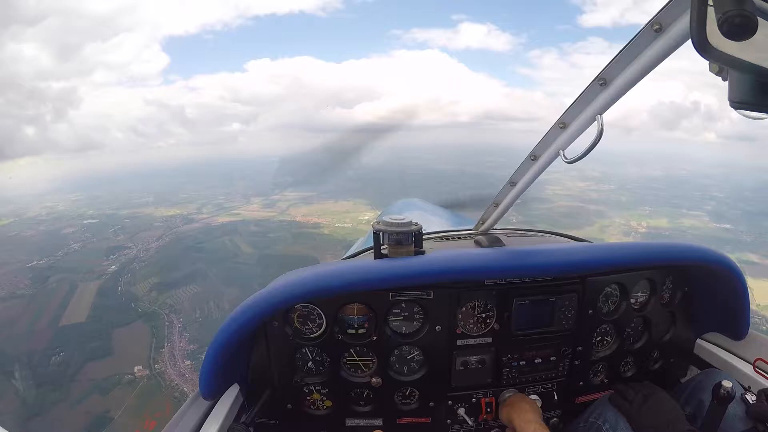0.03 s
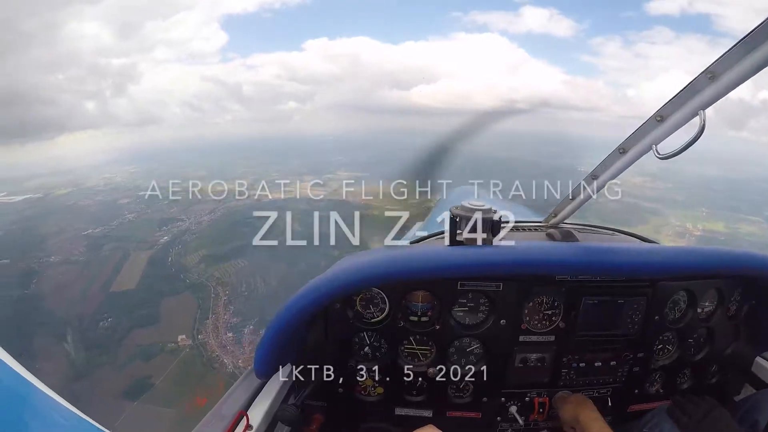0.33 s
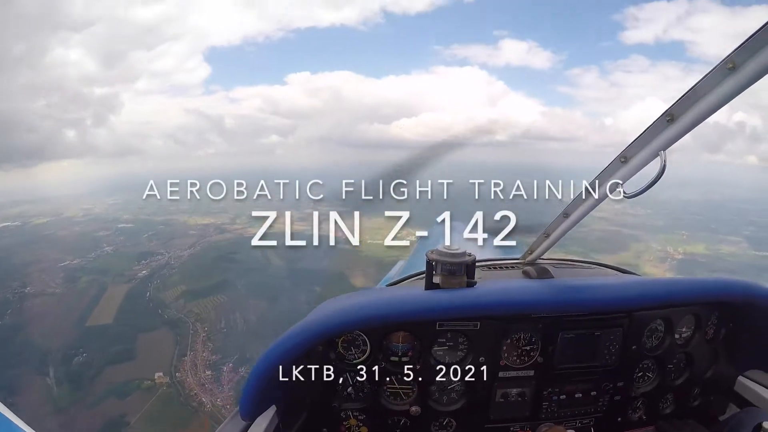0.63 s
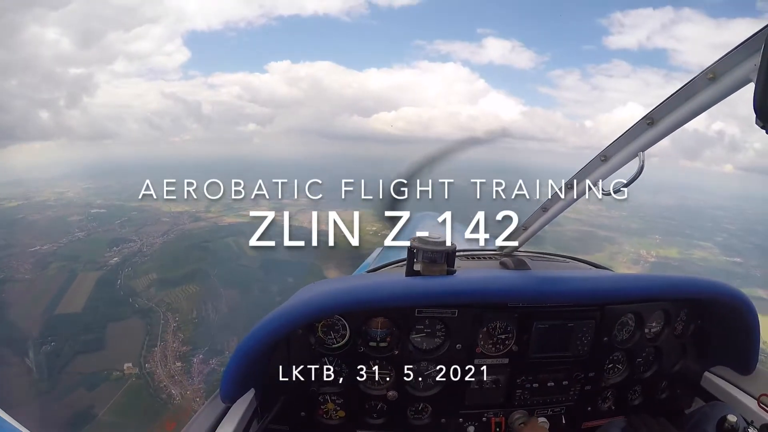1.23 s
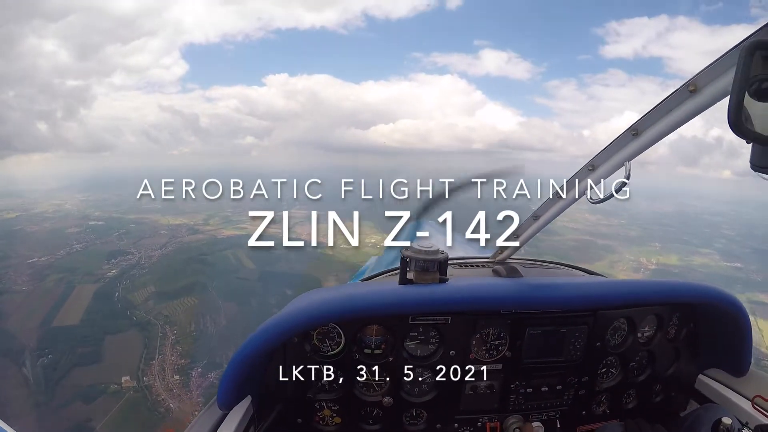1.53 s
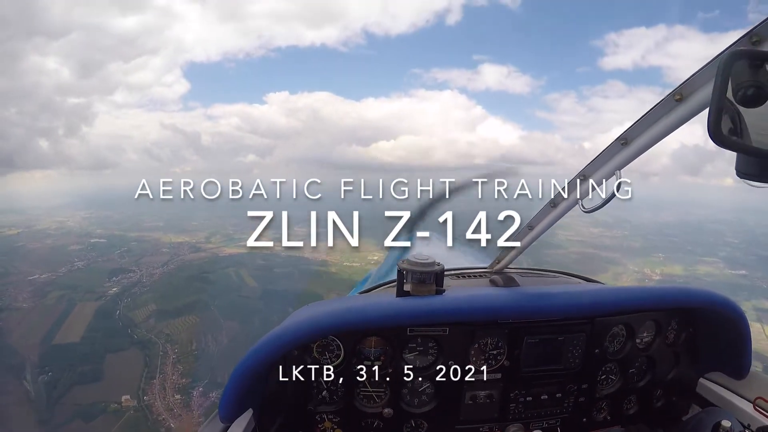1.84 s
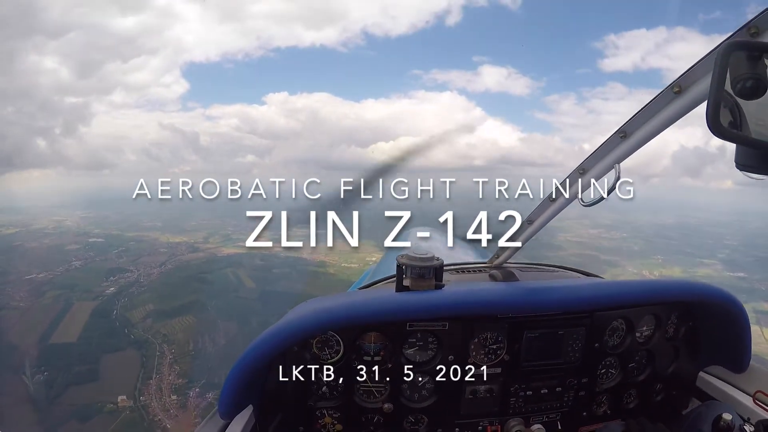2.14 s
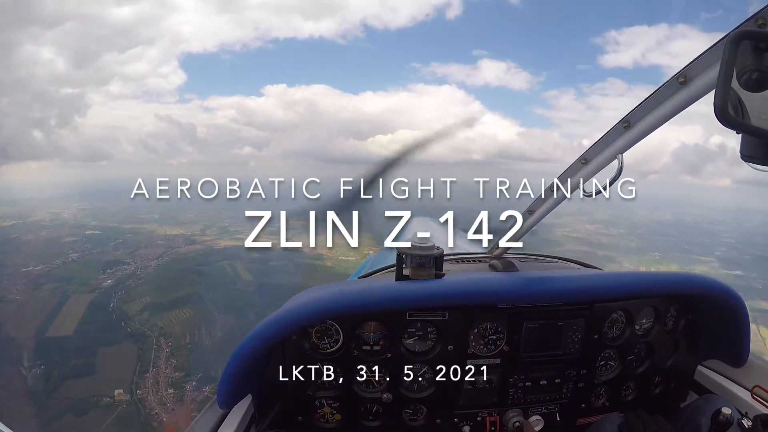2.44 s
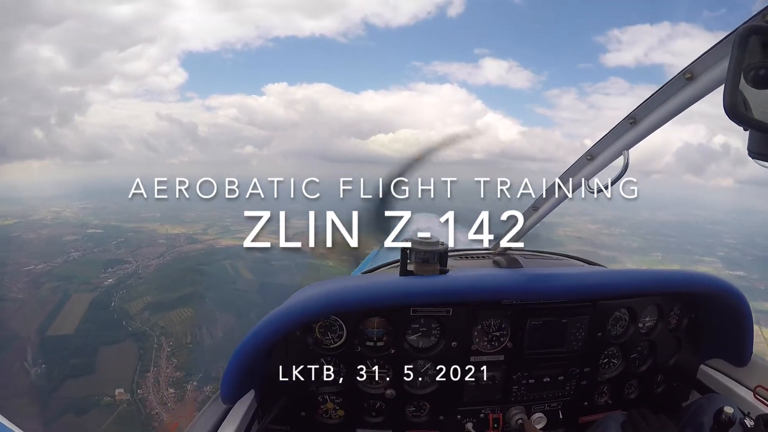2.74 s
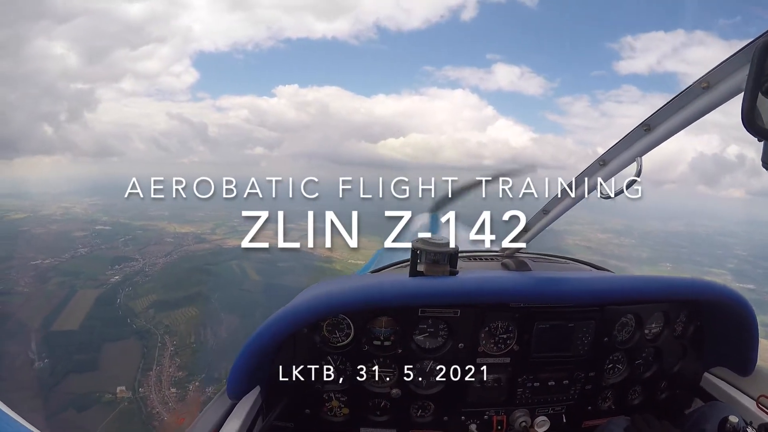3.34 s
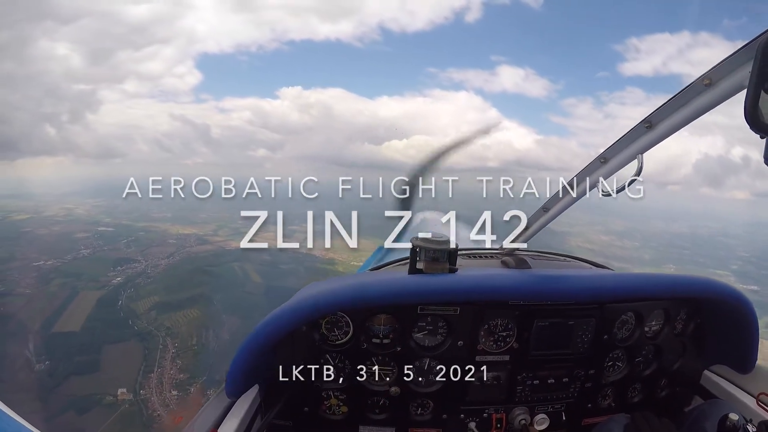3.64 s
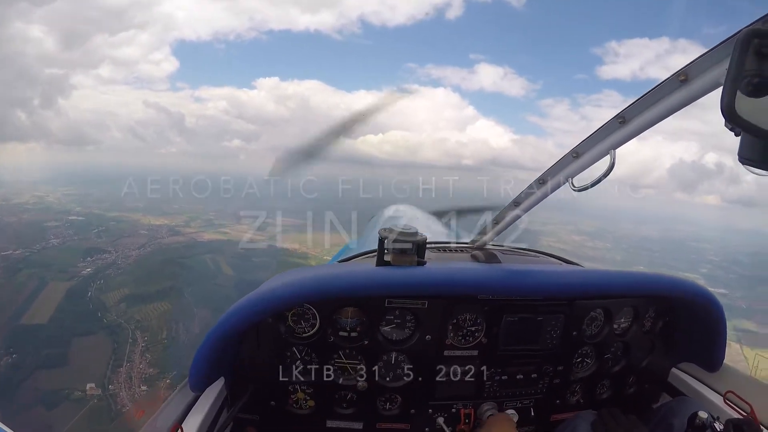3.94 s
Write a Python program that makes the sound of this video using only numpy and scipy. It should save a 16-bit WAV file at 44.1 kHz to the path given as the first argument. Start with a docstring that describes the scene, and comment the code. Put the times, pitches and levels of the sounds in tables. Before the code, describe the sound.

Heard from within the cockpit, a light aircraft's engine and propeller throb with a loud, ringing roar. The pitch holds, sags, then falls further near the end, while air buffets the canopy and whistles thinly through gaps.

```python
"""Cockpit of a light aerobatic plane: a six-cylinder engine and two-blade propeller drone, then slow.
Their low orders throb over buffeting air. The firings shake cowling and canopy into a ringing roar;
the exhaust stirs a boom in the cabin air. The slipstream whistles over canopy gaps and leaking air
hisses, both easing as the plane slows. All noise but the buffeting pulses with the engine."""
import sys
import numpy as np
from scipy import signal
from scipy.fft import rfft, irfft
from scipy.io import wavfile
from scipy.ndimage import uniform_filter1d

SR = 44100
rng = np.random.default_rng(int(sys.argv[2]) if len(sys.argv) > 2 else 0)


def master_out(mix):
    """Clip the mix to full scale and print it as 16-bit PCM to the path in sys.argv[1]."""
    frames = np.transpose(np.atleast_2d(mix))
    ceiling = np.clip(frames, -1, 1)
    pcm = np.round(ceiling * 32767).astype(np.int16)
    wavfile.write(sys.argv[1], SR, pcm)


N = 176400

# engine speed, two shaft turns a cycle (time [s], cycle rate [Hz])
CYCLE_RATE = [(0.1, 22.4), (0.7, 22.45), (1.25, 22.36), (1.45, 22.11), (1.8, 21.47), (2.1, 21.03),
              (2.35, 20.81), (2.86, 20.69), (2.98, 20.29), (3.15, 19.37), (3.35, 18.39), (3.72, 16.92),
              (3.9, 16.64), (4.0, 16.58)]
# noise pulsation (order [per cycle], depth [ratio])
THROB_ORDERS = [(1, 0.037), (2, 0.049), (3, 0.044), (4, 0.096), (6, 0.049), (8, 0.12)]
# main tones before trim (time [s], shaft [dB], blade pass [dB], firing [dB])
TONE_LEVELS = [(0.1, -26, -18.0, -19.5), (0.7, -37, -18.5, -17.5), (1.0, -30, -19, -18.5),
               (1.25, -31.7, -19.5, -18.5), (1.45, -33, -18, -19.5), (1.62, -32.5, -16, -20.5),
               (1.8, -27.1, -19, -23.3), (2.1, -23, -16, -24), (2.35, -20, -19.5, -39),
               (2.72, -27, -16, -49), (2.86, -30, -20, -35), (2.98, -29, -22.5, -38), (3.15, -29, -17, -26),
               (3.35, -33.2, -20, -41), (3.55, -32, -16.5, -32), (3.72, -25, -35, -22),
               (3.9, -31, -16.5, -32), (4.0, -29, -18, -25)]
# lope of uneven cylinders (time [s], level [dB])
LOPE_LEVEL = [(0.1, -18.5), (0.6, -25), (1.05, -18), (1.5, -27), (1.7, -20.5), (1.9, -31.5), (2.7, -29),
              (2.86, -16), (3.05, -27), (4, -36)]
# exhaust overtones (order [per cycle], base level [dB])
EXHAUST_ORDERS = [(7, -34), (8, -37.5), (9, -38), (10, -37), (11, -33.5), (12, -32.5), (14, -40.5),
                  (16, -40), (17, -36.5), (21, -42.5), (22, -36.5), (44, -30.5)]

# roar, boom and panels together (time [s], gain [dB])
CABIN_GAIN = [(0.1, -0.5), (0.8, 0), (1.6, 0.5), (2.3, 0), (2.65, 0.8), (3.05, -1), (3.5, -0.35), (4, -2)]
# broad roar (frequency [Hz], density [dB/Hz])
ROAR_SPECTRUM = [(70, -67), (120, -52), (165, -48.5), (240, -48), (285, -52.5), (400, -54.5), (600, -55),
                 (780, -54), (1050, -57.5), (1250, -65), (1570, -67), (1700, -63.5), (2300, -64.5),
                 (2900, -66.5), (3300, -73), (4400, -83), (6000, -99)]
# cabin air modes (centre [Hz], width [Hz], peak [dB/Hz])
AIR_MODES = [(159.4, 49, -45), (303, 35, -49.5), (334, 31, -53), (378.3, 45, -50.5)]
# panel modes (centre [Hz], width [Hz], peak [dB/Hz])
PANEL_MODES = [(477, 63, -51), (599, 38, -57), (1387, 110, -65), (1807, 92, -52.5), (1968, 111, -52),
               (2146, 53, -56.5), (2245, 115, -59), (2378, 99, -59), (2633, 80, -64), (3040, 100, -67.5)]
# strongest panel and canopy modes (centre [Hz], width [Hz], peak [dB/Hz])
RING_MODES = [(843, 71, -53.5), (933.5, 94, -47), (1004, 74, -45.5), (1079, 87, -54)]
# their swell (time [s], relative level [dB])
RING_SWELL = [(0.2, -23.5), (0.48, -21.5), (0.65, -21.5), (0.93, -24), (1.15, -19.5), (1.38, -23),
              (1.53, -18.9), (1.75, -22.0), (1.93, -23), (2.13, -19.5), (2.48, -22.5), (2.6, -18.5),
              (3.0, -22.5), (3.18, -21.0), (3.35, -22), (3.52, -19), (3.7, -21), (3.88, -21)]

# slipstream (time [s], relative level [dB])
WIND_SWELL = [(0.1, -34), (0.55, -33), (0.85, -31.5), (1.3, -32.3), (1.8, -34.5), (2.6, -34.5),
              (3.0, -35.5), (4, -37.5)]
# slipstream (frequency [Hz], density [dB/Hz])
WIND_SPECTRUM = [(2000, -97), (3200, -77.5), (3650, -63.5), (3850, -71.5), (4350, -75.5), (4700, -71),
                 (5100, -79), (6500, -80), (7300, -84), (9000, -94), (15000, -115)]
# canopy gap resonances (centre [Hz], width [Hz], peak [dB/Hz])
GAP_MODES = [(3957, 224, -62.5), (4175, 177, -61.5), (4460, 150, -66), (4670, 67, -73), (5730, 170, -73.5),
             (6180, 100, -73.5), (7660, 330, -84.5)]
# buffeting (time [s], gain [dB])
BUFFET_GAIN = [(0.1, -6), (0.8, -6), (1.35, 1.5), (1.75, -2), (1.95, 0.5), (2.6, 3), (3.15, 4.5), (3.5, 0),
               (3.7, 3.5), (4, 6)]
# buffeting (frequency [Hz], density [dB/Hz])
BUFFET_SPECTRUM = [(12, -68), (22, -48), (36, -39.5), (48, -42), (64, -37.5), (85, -43.5), (115, -49),
                   (200, -64), (400, -87)]
# leaking air (time [s], relative level [dB])
LEAK_SWELL = [(0.1, -48.2), (1.25, -48.5), (1.9, -51.2), (2.8, -54.2), (3.3, -54), (4, -54.5)]
# leaking air (frequency [Hz], density [dB/Hz])
LEAK_SPECTRUM = [(4000, -100), (7000, -88.5), (8300, -87.5), (8750, -83), (9400, -86.5), (11300, -90),
                 (11600, -87), (12400, -88), (12900, -93), (13500, -90), (14200, -94), (15300, -96)]

SHAFT_ORDER, LOPE_ORDER, BLADE_ORDER, FIRING_ORDER = 2, 3, 4, 6
SHAFT_TRIM_DB, BLADE_TRIM_DB, FIRING_TRIM_DB, RING_TRIM_DB = -.5, .6, .1, -.06


def from_db(db):
    """Decibels to gain."""
    return 10 ** (np.asarray(db) / 20)


def curves(rows):
    """Each column of a time table, per sample."""
    times_s, *columns = np.transpose(rows)
    return [np.interp(np.arange(N) / SR, times_s, column) for column in columns]


def swing(rows):
    """Gain of a level curve about its mean."""
    db, = curves(rows)
    return from_db(db - db.mean())


def drift(rate_hz):
    """Slow random wander, standard deviation 1."""
    hop, settle = 40, 2000
    pole = np.exp(-2 * np.pi * rate_hz * hop / SR)
    white = rng.standard_normal(N // hop + settle + 2)
    slow = signal.lfilter([1], [1, -2 * pole, pole * pole], white)[settle:]
    return np.interp(np.arange(N) / hop, np.arange(len(slow)), (slow - slow.mean()) / slow.std())


def turbulence(pulse):
    """Spectrum of 0 dB/Hz white noise times a pulse gain, and its frequencies."""
    spectrum = rfft(rng.standard_normal(N) * pulse) * np.sqrt(SR / 2)
    return spectrum, np.maximum(np.arange(N // 2 + 1) * SR / N, 1)


def coloured(rows, pulse=1):
    """Turbulence shaped by a spectrum table."""
    spectrum, hz = turbulence(pulse)
    points_hz, points_db = np.transpose(rows)
    db = np.interp(np.log(hz), np.log(points_hz), points_db, left=-140, right=-140)
    return irfft(spectrum * from_db(db), N)


def resonance(centre_hz, width_hz, peak_db, pulse):
    """Turbulence ringing in one steep-sided resonance."""
    spectrum, hz = turbulence(pulse)
    detuning = (hz ** 2 - centre_hz ** 2) / (hz * width_hz)
    return irfft(spectrum * from_db(peak_db) / (1 + 1j * detuning) ** 2, N)


def sustained(noise, window_s=.2):
    """Evens out slow swells, as under a steady drive."""
    power = uniform_filter1d(noise ** 2, int(window_s * SR), mode="wrap")
    return noise * np.sqrt(power.mean() / power)


def locked_tone(phase, order):
    """Engine order, rms 1, aligned to one common push per cycle."""
    return -np.sqrt(2) * np.sin(order * phase)


def offset_tone(phase, order):
    """Engine order, rms 1, at a random angle to the cycle."""
    return locked_tone(phase + rng.uniform(0, 2 * np.pi), order)


def cycle_phase(jitter=.00084, push_s=.1865):
    """Engine cycle angle [rad], zero at the push at push_s."""
    cycle_hz, = curves(CYCLE_RATE)
    phase = 2 * np.pi * np.cumsum(cycle_hz * (1 + jitter * drift(7.3))) / SR
    return phase - phase[int(push_s * SR)]


def drone(phase, shaft_db, blade_db, firing_db, lope_waver_db=.5):
    """Shaft, blade-pass and firing tones; uneven cylinders lope at half the firing rate."""
    shaft = from_db(shaft_db + SHAFT_TRIM_DB) * offset_tone(phase, SHAFT_ORDER)
    blades = from_db(blade_db + BLADE_TRIM_DB) * locked_tone(phase, BLADE_ORDER)
    firing = from_db(firing_db + FIRING_TRIM_DB) * locked_tone(phase, FIRING_ORDER)
    lope_db = curves(LOPE_LEVEL)[0] + lope_waver_db * drift(4)
    return shaft + blades + firing + from_db(lope_db) * locked_tone(phase, LOPE_ORDER)


def exhaust(phase, firing_db, follow=.45, waver_db=2):
    """Wavering overtones that partly follow the firing tone's level."""
    load_db = follow * (firing_db - firing_db.max())
    return sum(from_db(db + load_db + waver_db * drift(2.9)) * offset_tone(phase, order)
               for order, db in EXHAUST_ORDERS)


def cabin_roar(throb):
    """Broad engine noise, pulsing with the cycle."""
    return coloured(ROAR_SPECTRUM, 1 + throb)


def cabin_boom(throb, follow=.3):
    """Cabin air stirred by the exhaust; partly follows the buffeting's level."""
    boom = sum(resonance(*mode, 1 + throb) for mode in AIR_MODES)
    return sustained(boom) * swing(BUFFET_GAIN) ** follow


def panels(throb, waver_db=1.16):
    """Panels shaken by the firings, each mode wavering on its own."""
    return sum(sustained(resonance(*mode, 1 + .53 * throb)) * from_db(waver_db * drift(4.8))
               for mode in PANEL_MODES)


def main_ring(throb):
    """Panel and canopy modes near 1 kHz, throbbing deeply."""
    ring = sum(resonance(*mode, 1 + 1.7 * throb) for mode in RING_MODES)
    return sustained(ring) * swing(RING_SWELL) * from_db(RING_TRIM_DB)


def slipstream(pulse, whistle_waver_db=.9, flutter_db=.4):
    """Air rushing over resonant canopy gaps; one gap whistles."""
    rush = coloured(WIND_SPECTRUM, pulse)
    gaps = sum(resonance(*mode, pulse) for mode in GAP_MODES)
    whistle = sustained(resonance(centre_hz=3506, width_hz=70, peak_db=-56, pulse=pulse))
    whistle *= from_db(whistle_waver_db * drift(2.4))
    return (rush + gaps + whistle) * swing(WIND_SWELL) * from_db(flutter_db * drift(12))


def buffeting():
    """Low rumble of buffeting air."""
    return sustained(coloured(BUFFET_SPECTRUM)) * from_db(curves(BUFFET_GAIN)[0])


def leak_hiss(pulse):
    """Fine hiss of leaking air."""
    return coloured(LEAK_SPECTRUM, pulse) * swing(LEAK_SWELL)


def scene():
    """One crankshaft drives the tones and the throb of the noise. Mono."""
    phase = cycle_phase()
    throb = sum(depth * offset_tone(phase, order) for order, depth in THROB_ORDERS)
    shaft_db, blade_db, firing_db = curves(TONE_LEVELS)
    engine = drone(phase, shaft_db, blade_db, firing_db) + exhaust(phase, firing_db)
    cabin = (cabin_roar(throb) + cabin_boom(throb) + panels(throb)) * from_db(curves(CABIN_GAIN)[0])
    ring = main_ring(throb)
    air_pulse = 1 + .38 * throb
    air = slipstream(air_pulse) + buffeting() + leak_hiss(air_pulse)
    return (engine + cabin + ring + air)[None]


def record(dry):
    """Quick fade-in from silence, soft clip, steep low-pass."""
    start_s, fade_s, cutoff_hz = .072, .011, 15280
    fade_in = np.clip((np.arange(N) / SR - start_s) / fade_s, 0, 1)
    rounded = 1.615 * np.tanh(dry * fade_in / 1.596)
    return signal.sosfilt(signal.ellip(14, .1, 90, cutoff_hz, fs=SR, output="sos"), rounded)


dry = scene()
out = record(dry)
master_out(out)
```